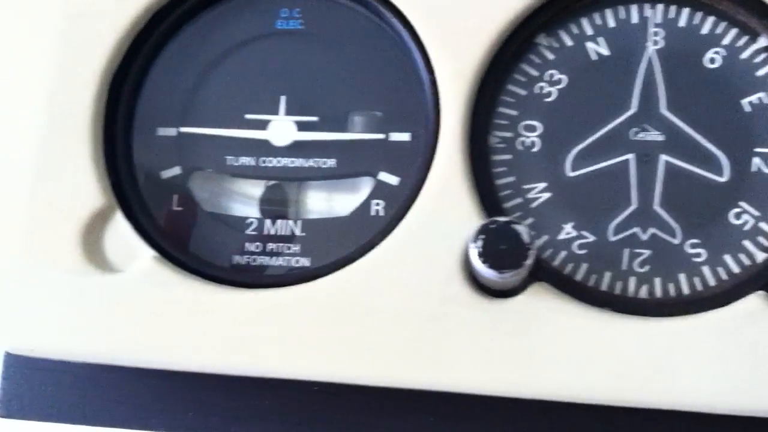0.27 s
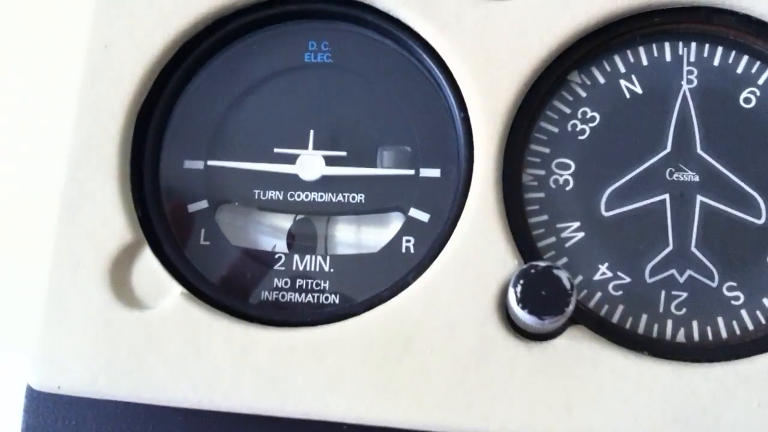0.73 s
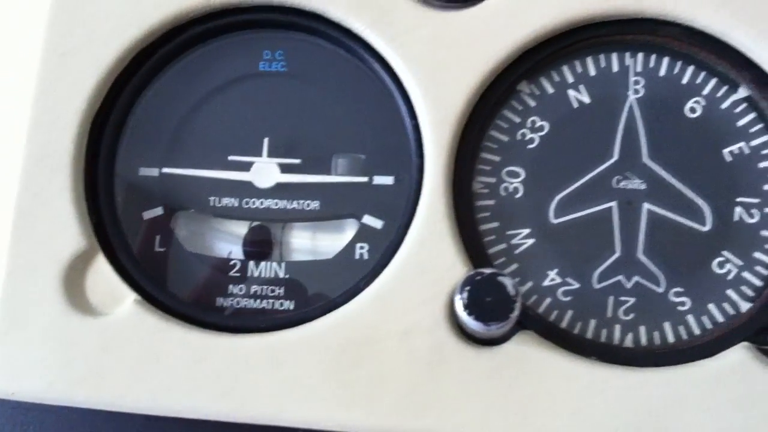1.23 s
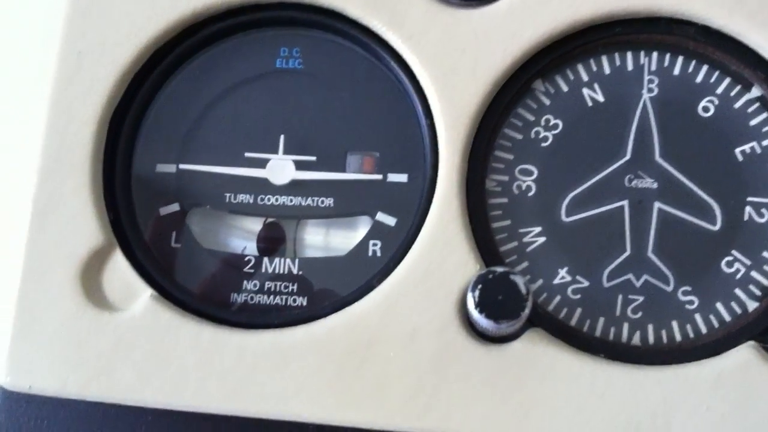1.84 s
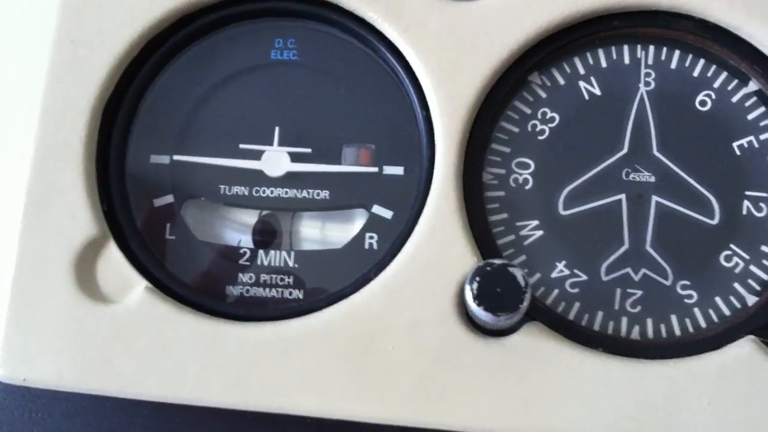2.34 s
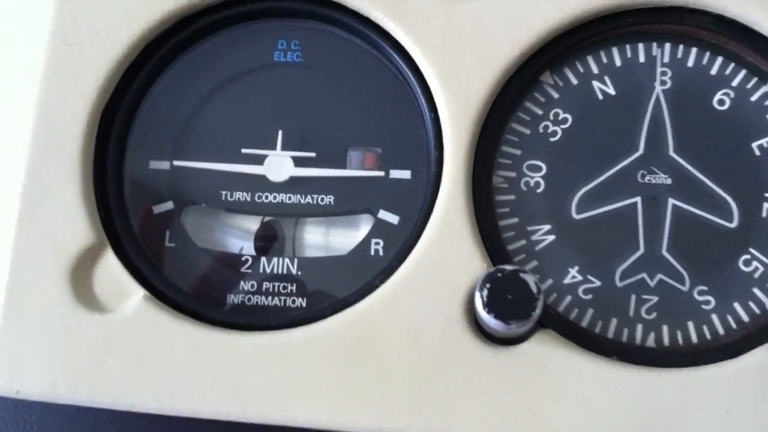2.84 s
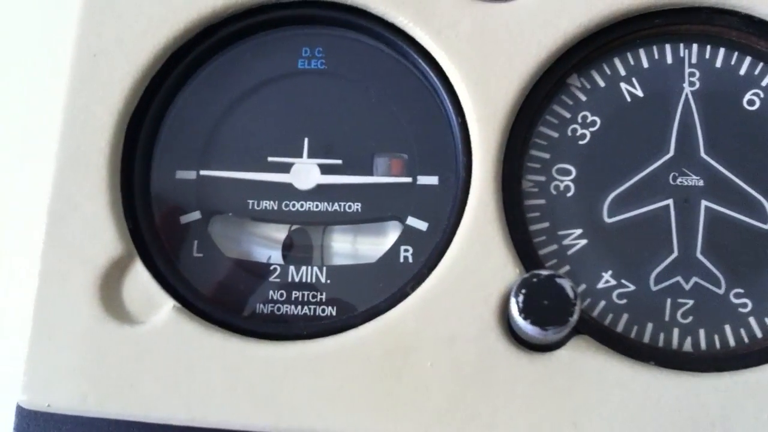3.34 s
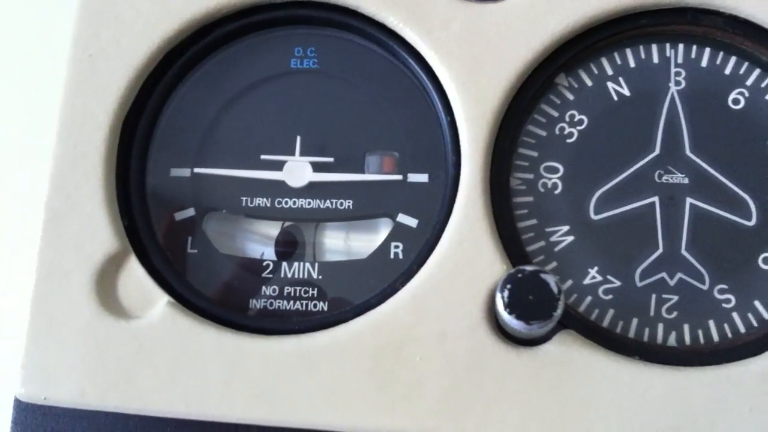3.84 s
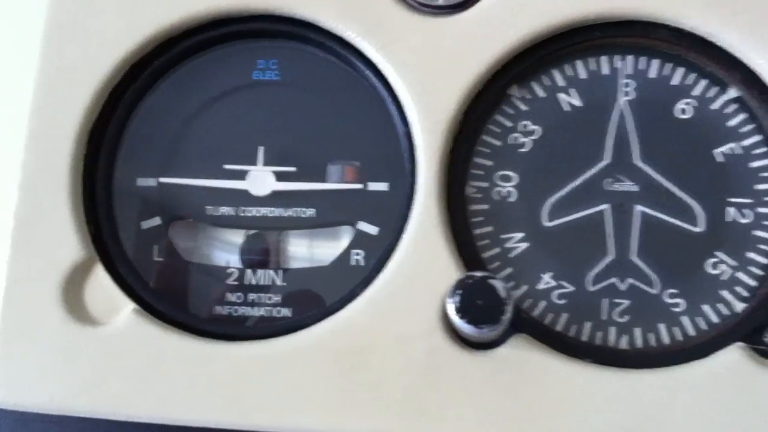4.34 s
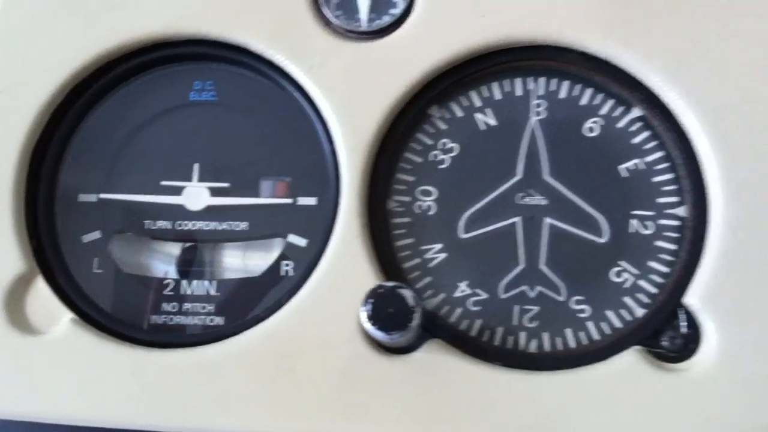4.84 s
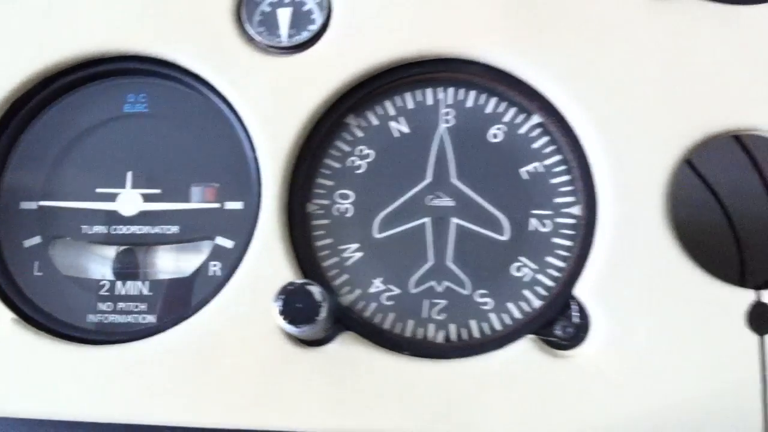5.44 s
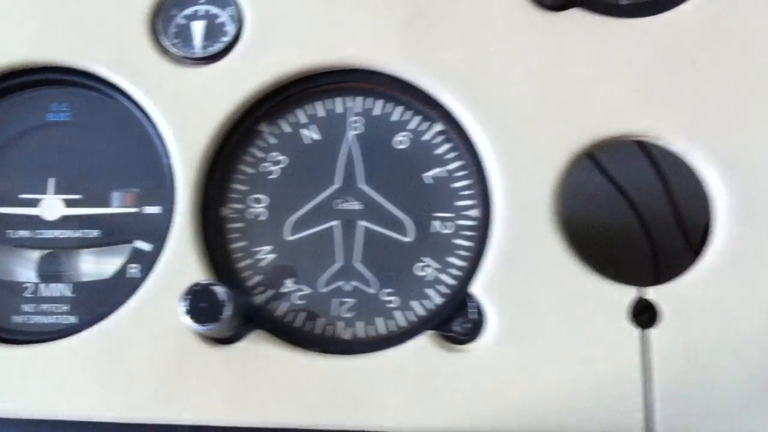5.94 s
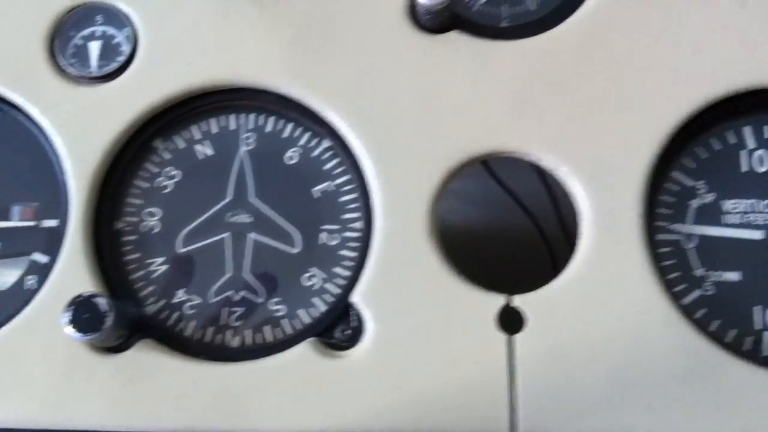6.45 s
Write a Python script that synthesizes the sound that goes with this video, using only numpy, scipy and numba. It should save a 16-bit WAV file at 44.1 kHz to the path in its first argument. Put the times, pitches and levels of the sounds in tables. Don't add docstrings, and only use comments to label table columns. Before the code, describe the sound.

A small gyro rotor whirs steadily behind a cockpit instrument panel, a quiet airy hiss laced with thin bearing whines. After barely audible finger ticks on plastic, a rocker switch snaps hard at about one and a half seconds, with a brief hollow cabin ring. The rotor then coasts, its tones sinking slowly in pitch. Faint low rumble lies beneath. A hand-held phone hears it closely, its drifting position changing the hiss.

```python
import sys
import numpy as np
from scipy import signal
from scipy.fft import rfft, irfft
from scipy.io import wavfile
from scipy.ndimage import uniform_filter1d
from numba import njit

SR = 44100
rng = np.random.default_rng(int(sys.argv[2]) if len(sys.argv) > 2 else 0)


def store_pcm(level_fs):
    pcm = np.round(np.clip(level_fs, -1, 1) * 32767).astype(np.int16)
    wavfile.write(sys.argv[1], SR, np.atleast_2d(pcm).T)


def ratio(d):
    e = np.asarray(d, float) / 20
    return 10 ** e


N = 295029
TIME = np.arange(N) / SR

SHAFT_HZ, BALL_PASS_HZ = 123.787, 579.525
POWER_CUT_S, DRAG, DRAG_GROWTH = 1.5, .038353, .0005335


def level(x, db):
    return x * ratio(db) / np.sqrt(np.mean(x ** 2))


def colour(x, shape):
    hz, db = np.transpose(shape)
    bins = np.maximum(np.arange(len(x) // 2 + 1) * SR / len(x), 1)
    gain_db = np.interp(np.log(bins), np.log(hz), db, left=-80, right=-80)
    return irfft(rfft(x) * ratio(gain_db), len(x))


@njit
def svf(x, hz, width):
    y, b, l = np.empty(len(x)), 0., 0.
    for i in range(len(x)):
        g, k = np.tan(np.pi * hz[i] / SR), width / hz[i]
        v = (b + g * (x[i] - l)) / (1 + g * (g + k))
        b, l, y[i] = 2 * v - b, l + 2 * g * v, k * v
    return y


def band(x, hz, width):
    centre = hz * np.ones(len(x))
    once = svf(x, centre, 1. * width)
    return level(svf(once, centre, 1. * width), 0)


def noise(length):
    return rng.standard_normal(length)


def walk(rate):
    k = int(SR / rate)
    steps = np.repeat(noise(N // k + 1), k)
    return 1.62 * uniform_filter1d(uniform_filter1d(steps, k), k)[:N]


def fade(length, t60):
    return np.exp(-np.log(1000) * np.arange(length) / SR / max(t60, .002))


def spin():
    coast = np.maximum(TIME - POWER_CUT_S, 0)
    return np.cumsum(np.exp(-DRAG * coast - DRAG_GROWTH * coast ** 2)) / SR


# pitch_hz, level_db (per Hz)
RUMBLE_SHAPE = [(12, -42), (20, -11), (48, -17), (65, -8.5), (93, -8), (123, 2.5), (252, 0), (330, -1),
                (430, -26), (730, -120)]
# pitch_hz, level_db
HUM_LINES = [(118.4, -70), (145.3, -71.5), (193.8, -71)]


def outside():
    rumble = level(colour(noise(N), RUMBLE_SHAPE), -64.5) * ratio(0.21 * walk(3.58))
    hum = 0
    for hz, db in HUM_LINES:
        swell, drift = ratio(db + 2.5 * walk(4.29)), 1.85 * walk(3.4)
        hum = hum + np.sqrt(2) * swell * np.sin(2 * np.pi * hz * TIME + drift)
    return rumble + hum


CABIN_T60_S = 0.32
# start_s, peak_db, centre_hz, width_hz, t60_s
FINGER_TICKS = [(1.057, -51, 5000, 9000, 0.034), (1.066, -46, 2850, 600, .06),
                (1.4435, -46, 200, 300, 0.075), (1.488, -40, 13500, 4000, .015),
                (1.065, -47, 6000, 10000, 0.035), (1.097, -47, 6000, 8000, .03),
                (1.444, -26, 3500, 1000, 0.035), (1.4452, -35, 3540, 1200, 0.02),
                (1.4446, -29, 6550, 5000, 0.014), (1.458, -42, 4000, 6000, 0.034),
                (1.7305, -39.5, 13000, 8000, .03), (1.735, -50, 15200, 1200, .1),
                (1.766, -44, 3580, 3000, .03), (1.777, -42, 3500, 7000, 0.045),
                (2.5304, -38.5, 11600, 12000, 0.037), (2.533, -47, 14500, 4000, .09),
                (2.552, -45, 9000, 9000, .02), (1.731, -42, 4000, 7000, 0.023),
                (2.543, -47, 9000, 12000, .03)]


def ticks():
    out, length = np.zeros(N), 8192
    for s, db, hz, width, t60 in FINGER_TICKS:
        burst = band(noise(length), hz, width)
        decay = fade(length, t60) + 0.64 * fade(length, 0.0037) + 0.1 * fade(length, CABIN_T60_S)
        out[int(s * SR):][:length] += .5 * ratio(db) * burst * decay
    return out


# (listed, but every mode dies away with a t60 of 0.025
# s)
ROCKER_MODES = [(1200, -13, 0.066), (900, -31, .06), (2085, 6, 0.058), (2280, -9, 0.074), (3460, 5.5, 0.05),
                (4680, 2.5, 0.04), (5130, 0.5, 0.032), (5400, -7, 0.053), (7340, 0, 0.04),
                (9000, -7, 0.046), (9900, -24, 0.025), (12400, -12, 0.038), (12500, -21, 0.13),
                (15200, -19, 0.039)]
# pitch_hz, level_db (per Hz)
CABIN_SHAPE = [(59, -54), (100, -25), (181, -1.5), (400, -7.5), (801, -8), (910, -2), (1100, -5), (1300, 0),
               (1520, -6.5), (1950, 2.5), (2750, -5.5), (3600, 4), (4380, -7.5), (13500, -13.5),
               (16000, -19)]
# centre_hz, width_hz, level_db, t60_s
CABIN_HOLLOW = [(72.5, 30, -61, .5), (152, 45, -50, .45), (880, 200, -47, 0.24), (1300, 260, -38, .3),
                (1950, 110, -29.5, 0.25), (2315, 72, -42.5, 0.39), (2510, 100, -38.5, 0.35),
                (3250, 160, -51, 0.32), (3480, 170, -41, 0.21), (4660, 150, -47, 0.11),
                (5240, 310, -36, 0.23)]
SNAP_S, SNAP_DB, CRACK_DB, CABIN_DB = 1.4596, -3.5, -2.5, -23.5


def switch():
    t = TIME[:SR // 2]
    length = len(t)
    ring = 0
    for hz, db, t60 in ROCKER_MODES:
        decay = fade(length, min(0.95 * t60, .025))
        ring = ring + ratio(db) * decay * np.sin(2 * np.pi * (hz * t + rng.random()))
    crack = ratio(CRACK_DB) * fade(length, 0.02) * level(colour(noise(length), CABIN_SHAPE), 0)
    blow = (1 + 1.17 * fade(length, 0.0063)) * (1 - fade(length, 0.0033))
    hit = 0.64 * blow * (ring / np.abs(ring).max() + crack)
    thin_hit = signal.sosfilt(signal.butter(2, 800, "high", fs=SR, output="sos"), hit)

    tail = level(colour(noise(length), CABIN_SHAPE), CABIN_DB)
    tail = tail * fade(length, CABIN_T60_S) * (1 - fade(length, 0.0074))
    hollow = 0
    for hz, width, db, t60 in CABIN_HOLLOW:
        hollow = hollow + ratio(db) * band(noise(length), hz, width) * fade(length, t60)
    tail = tail + (1 - fade(length, .006)) * hollow

    out = np.zeros(N)
    out[int(SNAP_S * SR):][:length] = ratio(SNAP_DB) * (thin_hit + tail)
    return out


# start_s, nearness_db (to the gap), tilt_db (from the high ring to the low ring)
HAND_MOVES = [(0.0, 5, -4), (0.5, -1.5, 1), (0.85, -3.5, 1.5), (1.28, -0.5, -4), (1.85, -3, 1), (2.1, 0, 4),
              (2.42, -1.5, 6), (2.83, 5, 0), (3.36, 6, -2.5), (3.62, 3, -1), (3.94, 4, -4), (4.5, 3, -6),
              (4.7, 3.5, -7), (4.9, 1, -3), (5.4, -7, 0), (5.87, -1.5, -3), (6.27, 4.5, -8.5),
              (6.69, 2, -4)]


def hand(turns):
    s, near_db, tilt_db = np.transpose(HAND_MOVES)
    speed_db = 20 * np.log10(np.gradient(turns) * SR)
    field = np.exp(-(np.maximum(TIME - POWER_CUT_S, 0) / 0.21) ** 2)
    near, tilt = np.interp(TIME, s, near_db), np.interp(TIME, s, tilt_db)
    return np.array([np.ones(N), near, tilt, speed_db, field])


def rattle(turns, rough):
    uneven = np.interp(SHAFT_HZ * turns % 1, np.arange(48) / 48, noise(48), period=1)
    knock = np.exp(-((BALL_PASS_HZ * turns % 1 - .5) / .02) ** 2)
    race = np.tanh(2 * uneven)
    smear = signal.chirp(np.arange(512) / SR, 300, 512 / SR, 16000)
    knocks = signal.fftconvolve(knock * (race - race.mean() + .08), smear)[:N]
    return level(knocks, 0) + rough * noise(N)


# centre_hz, width_hz
CASE_RINGS = [(3030, 90), (5120, 260), (4040, 120), (11000, 350), (11900, 250), (3300, 220)]
# level_db, nearness_share, tilt_share, db_per_speed_db, powered_db
RING_DRIVE = [(-75, .01, 0.93, 0, -12), (-73, .01, -0.97, 2.5, 1.5), (-77.5, 0.16, -0.42, 17, 8.5),
              (-83, 0.39, -1.1, 0, 3), (-76.5, 0.23, -0.77, 5, 3), (-97, 0.99, -1.5, -1, -10)]


def rings(drive, controls):
    levels_db = np.array(RING_DRIVE) @ controls
    return sum(ratio(db) * band(drive, *ring) for ring, db in zip(CASE_RINGS, levels_db))


# pitch_hz, level_db (per Hz)
CASE_SHAPE = [(1290, -30), (2200, -19), (2420, -15), (2610, 2), (2830, -7), (2980, -1.5), (3680, 7),
              (4180, 6.5), (4470, 12), (4820, 4.5), (5270, -9), (5550, -3.5), (6800, -13.5), (8840, -41),
              (15000, -120)]
PANEL_SHAPE = [(180, -25), (300, -3), (337, -17.5), (420, -6), (621, -2.5), (760, -4.5), (1080, -12),
               (1340, -2.5), (1550, -5), (1780, 1.5), (2150, -2), (2350, -13), (2500, -9.5), (3250, -30),
               (5500, -120)]
TREBLE_SHAPE = [(3240, -17.5), (5500, -6), (6110, -11), (7540, -1), (8380, -1), (9270, -7), (10700, -1),
                (12200, -8.5), (13400, -12.5), (15200, -13), (15700, -12)]
# level_db, nearness_share, tilt_share, db_per_speed_db, powered_db
CASE_DRIVE = (-64.5, 0.24, -0.15, 0.2, -0.2)
PANEL_DRIVE = (-57, -0.25, -0.48, 3.5, -1.9)
GAP_DRIVE = (-59.5, 0.5, -0.5, 3, -5.5)
TREBLE_DRIVE = (-60.5, 0.1, 0, 1.46, -0.5)
GAP_HZ, GAP_HZ_PER_SPEED_DB = 4280, 114


def hiss(turns):
    controls = hand(turns)
    drives = np.array([CASE_DRIVE, PANEL_DRIVE, GAP_DRIVE, TREBLE_DRIVE])
    case_db, panel_db, gap_db, treble_db = drives @ controls
    drive = rattle(turns, rough=2.54)
    case = level(colour(drive, CASE_SHAPE), 2.76)
    panel = level(colour(drive + 2.54 * noise(N), PANEL_SHAPE), -1.46)
    gap = ratio(-6.5) * band(drive, GAP_HZ + GAP_HZ_PER_SPEED_DB * controls[3], 530.0)
    treble = level(colour(noise(N) + 0.67 * drive, TREBLE_SHAPE), 0.43)
    out = ratio(case_db) * case + rings(drive, controls) + ratio(panel_db) * panel
    return out + ratio(gap_db) * gap + ratio(treble_db + 0.33 * walk(7.2)) * treble


PATH_T60_S, HAND_MOVES_S, DIRECT = 0.18, 1.534, .8


def paths(x):
    step, out = int(HAND_MOVES_S * SR), np.zeros(N)
    for start in range(-step, N, step):
        part = slice(max(start, 0), min(start + 2 * step, N))
        share = np.sin(np.pi * (np.arange(N)[part] - start) / (2 * step))
        echoes = level(noise(4096) * fade(4096, PATH_T60_S), 0) / 64
        echoes[0] = DIRECT
        out[part] += share / np.hypot(1, DIRECT) * signal.fftconvolve(x[part], echoes)[:len(share)]
    return out


# centre_hz, width_hz, gain (negative =
HOUSING_RESONANCES = [(335, 9, 2.9), (344, 14, 4.3), (357, 10, 5.4), (473, 7, 2.0), (505, 30, 0.3),
                      (531, 42, 3.0), (570, 32, 6.0), (616, 17, 18.8), (661, 131, -6.3), (723, 24, -0.7),
                      (787, 95, 3.5), (820, 14, -0.3), (849, 10, -7.4), (911, 116, -0.6),
                      (991, 14, 3.6), (1110, 34, 2.0), (1186, 13, -7.3), (1280, 53, 0.3), (1356, 28, 0.7),
                    (1408, 77, 3.3), (1457, 27, 0.8), (1514, 13, 3.7), (1581, 33, -0.5), (1638, 56, 5.1),
                    (1744, 73, 10.0), (1826, 47, 4.5), (1903, 31, 5.2), (1958, 212, -9.6),
                      (2012, 71, 1.8), (2107, 62, 18), (2183, 294, -0.8), (2907, 32, 0.1), (3024, 30, -8.3),
                   (3327, 153, 2.7), (3956, 32, 2.8), (4087, 144, 7.7), (4227, 192, 3.4), (4331, 498, -3.4),
                   (4422, 73, 0.8), (4513, 141, -3.7), (4714, 35, -2.6), (5148, 95, 4.9),
                      (1027, 34, 2), (3535, 116, 0.5), (5520, 210, -1.7), (2390, 61, 1.5)]


def housing(hz):
    modes = HOUSING_RESONANCES
    return 1 + sum(gain / (1 + 2j * (hz - centre) / width) for centre, width, gain in modes)


# start_s, then one level_db per swinging tone
TONE_SWINGS = [(0, 2, -3, 5, 3), (.45, -3, 0, 4, -3), (.8, 1.5, 1, 0, -5), (1.15, 0.5, 3, -12, -8),
               (1.4, 4, 2, -5, -1), (1.9, -2, 4, 1, 1), (2.4, 1, 6, -1, -1.5), (2.9, 2.5, 4.5, 0, 6),
               (3.3, -1, -0.5, -3, 4), (3.65, 7, -1.5, -1, 5), (3.9, 6, 6, -3, -2), (4.2, -12, -8, -2, -7),
               (4.65, 2, -1, 4, 4), (5.15, 2, 4.5, -3, -4), (5.45, -17, -2, 0, -7), (5.7, 2, 3, -12, 8),
               (6.1, 0.5, 1.5, -4, -10), (6.69, -2.5, 1, -4, -1)]
SWINGING_TONES = [(3, 0), (4, 0), (9, 0), (0, 7)]


def swing_db(ball, shaft):
    if (ball, shaft) not in SWINGING_TONES:
        return 0
    rows = np.transpose(TONE_SWINGS)
    return np.interp(TIME, rows[0], rows[1 + SWINGING_TONES.index((ball, shaft))])


def tone(turns, ball, shaft):
    hz = ball * BALL_PASS_HZ + shaft * SHAFT_HZ
    return np.sqrt(2) * np.sin(2 * np.pi * (hz * turns + rng.random()))


# ball_multiple, shaft_multiple (may be fractional), far_bearing_share (0-1),
# in_step_s, level_db (off resonance)
BEARING_TONES = [(0, 3, 0.0, 0.32, -78.9), (1, 0, 0.58, 1.65, -79.6), (0, 5, 0.0, -0.26, -86.6),
                 (3, 0, 0.5, 0.2, -79.4), (4, 0, 0.04, 0.25, -86.3), (8, 0, 0.06, 0.18, -80.0),
                 (7, 3, 0.07, 0.17, -81.4), (1, 1, 0.11, 1.08, -88.3), (0, 4, 0.0, 2.94, -82.9),
                 (-1, 10, 0.5, 0.81, -94.1), (0, 6, 0.0, -0.57, -92.2), (0, 7, 0.0, -1.98, -84.2),
                 (1, 3, 0.3, 1.3, -83.6), (0, 8, 0.0, 1.83, -87.7), (2, 0, 0.15, 0.62, -84.9),
                 (1, 5, 0.45, 1.71, -88.2), (-2, 22, 0.1, 0.08, -81.3), (1, 11, 0.19, 0.82, -89.2),
                 (3, 3, 0.43, 0.49, -94.8), (6, 0, 0.2, 0.21, -84.4), (1, 6, 0.1, 0.27, -87.8),
                 (2, 2, 0.3, 0.64, -88.5), (-1, 17, 0.12, 0.31, -86.9), (2, 3, 0.33, 0.14, -86.8),
                 (4, -6, 0.23, 0.43, -86.7), (2, 5, 0.17, 0.11, -92.2), (1, 10, 0.13, 0.72, -88.4),
                 (3, 1, 0.1, 0.5, -91.8), (3, 2, 0.29, 0.29, -90.3), (7, 0, 0.15, 0.4, -88),
                 (8, -3, 0.09, 0.24, -88.6), (9, -3, 0.08, 0.25, -86.8), (8, 2, 0.11, 0.26, -88.9),
                 (8, 3, 0.1, 0.21, -87.7), (9, 0, 0.12, 0.41, -85.2), (6, -9, 0.14, 0.31, -90),
                 (5, 3, 0.1, 0.28, -90.5), (1, 13, 0.09, 0.05, -95.9), (10, -9, 0.12, 0.34, -92.6),
                 (3, 23, 0.08, 0.21, -92.2),
                 (10, 0, .2, .3, -83), (10, 3, .1, .2, -82), (11, 0, .2, .25, -83), (11, 3, .1, .2, -85),
              (11, -3, .1, .3, -85), (0, 43.23, 0, 0, -87), (0, 39.55, 0, 0, -86.5), (0, 32.59, 0, 0, -88),
              (0, 19.95, 0, 0, -92), (0, 24.26, 0, 0, -88), (0, 34.59, 0, 0, -92), (0, 52.8, 0, 0, -86),
              (0, 38.72, 0, 0, -90), (2, 1, .2, .6, -92), (2, -3, .2, .5, -94), (0, 24.85, 0, 0, -93),
              (1, 4, .2, 1.2, -91), (3, -2, .2, .3, -89), (2, 4, .2, .4, -95), (5, 0, .2, .3, -87),
              (0, 25.92, 0, 0, -89), (0, 25.07, 0, 0, -87), (1, 7, .2, .9, -92)]
SLIP_HZ = .5507
TONE_BOOST_DB, TONE_DB_PER_SPEED_DB, TONE_FLUTTER_DB = 1.8, .8, 1.1


def whine(turns):
    slow = slice(0, N, 256)
    speed, out = np.gradient(turns)[slow] * SR, 0
    for ball, shaft, far, in_step_s, db in BEARING_TONES:
        pair = 1 + 1.04 * far * np.exp(2j * np.pi * ball * SLIP_HZ * (turns[slow] - in_step_s))
        gain = np.abs(pair * housing((ball * BALL_PASS_HZ + shaft * SHAFT_HZ) * speed))
        swell = np.interp(TIME, TIME[slow], gain * speed ** TONE_DB_PER_SPEED_DB)
        tone_db = db + TONE_BOOST_DB + swing_db(ball, shaft) + TONE_FLUTTER_DB * walk(11)
        out = out + ratio(tone_db) * swell * tone(turns, ball, shaft)
    return out


def scene():
    turns = spin()
    mono = outside() + ticks() + switch() + paths(hiss(turns)) + whine(turns)
    return np.array([mono, mono])


# pitch_hz, empty_share (0-1)
EMPTY_SHARE = [(2500, .0), (2850, .05), (3300, .0), (5000, .01), (5650, .12), (5850, .03), (6120, .22),
               (6400, .05), (7800, .02), (9100, .1), (11000, .05), (13000, .24), (14500, .33), (15700, .18)]


def starve(x):
    hz, _, z = signal.stft(x, SR, nperseg=1024, noverlap=768)
    power = uniform_filter1d(uniform_filter1d(np.abs(z) ** 2, size=4, axis=0), size=9, axis=1)
    loud = power.sum(0) > 3 * np.median(power.sum(0))
    power = power / uniform_filter1d(power, size=30, axis=0)
    share = np.interp(hz, *np.transpose(EMPTY_SHARE), left=0)
    place = (share * power.shape[1]).astype(int)
    bar = np.sort(power, axis=1)[np.arange(len(hz)), place][:, None]
    kept = z * ((power > bar) | loud)
    return signal.istft(kept, SR, nperseg=1024, noverlap=768)[1][:N]


def low_pass(x):
    return signal.sosfilt(signal.butter(12, 16330, fs=SR, output="sos"), x)


def record(dry):
    cut = signal.butter(2, 30, "high", fs=SR, output="sos")
    top = signal.ellip(8, .3, 60, 15700, fs=SR, output="sos")
    rounded = .8 * np.tanh(np.array([starve(dry[0])] * 2) / .8)
    mix = signal.sosfilt(np.vstack([cut, top]), rounded)
    return low_pass(mix)


dry = scene()
out = record(dry)
store_pcm(out)
```